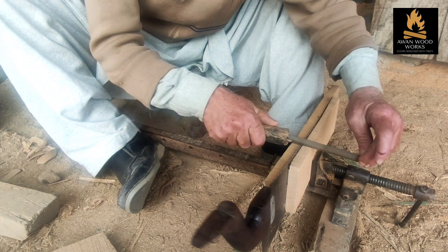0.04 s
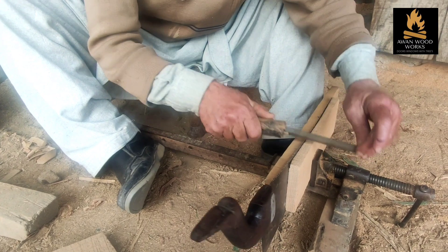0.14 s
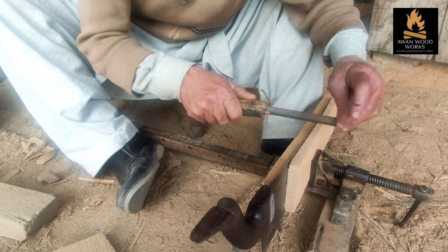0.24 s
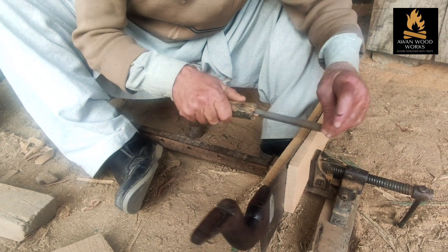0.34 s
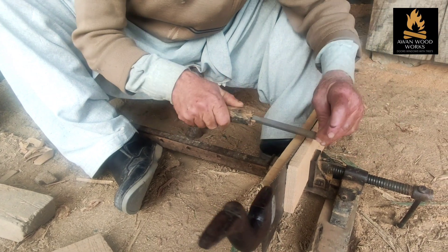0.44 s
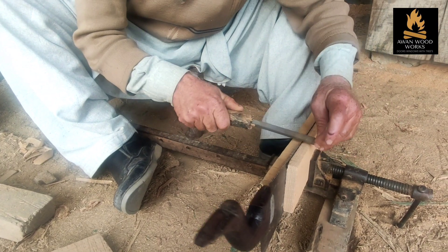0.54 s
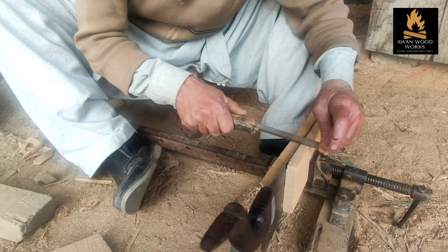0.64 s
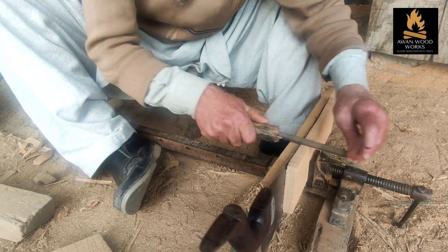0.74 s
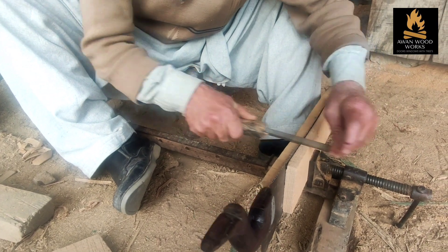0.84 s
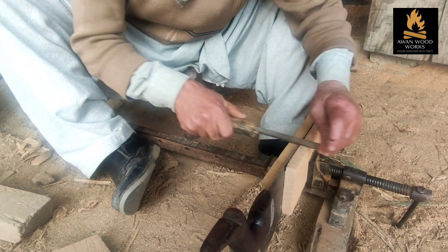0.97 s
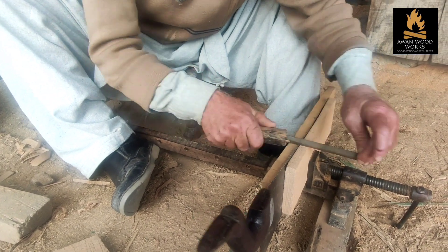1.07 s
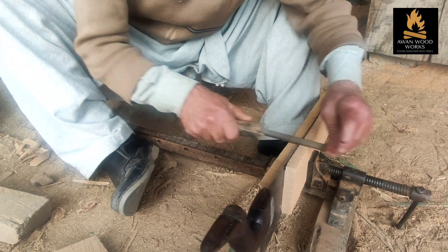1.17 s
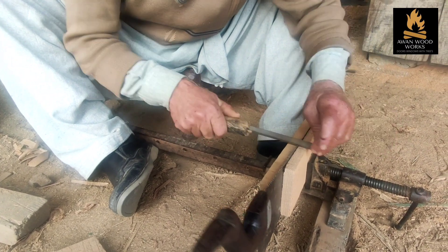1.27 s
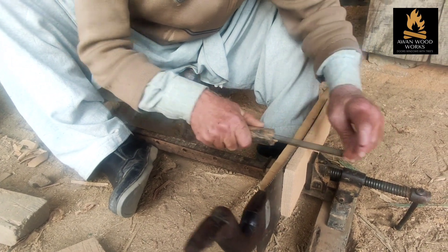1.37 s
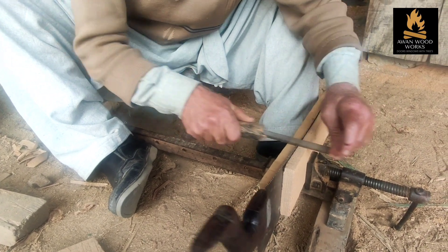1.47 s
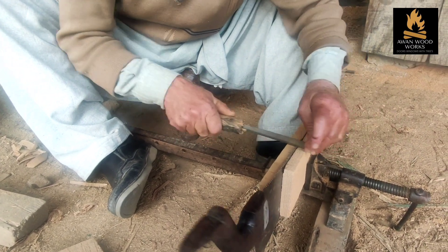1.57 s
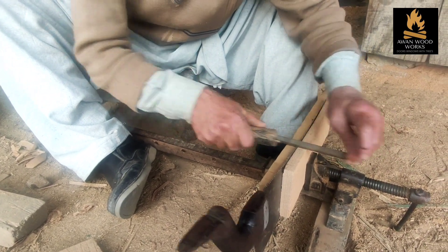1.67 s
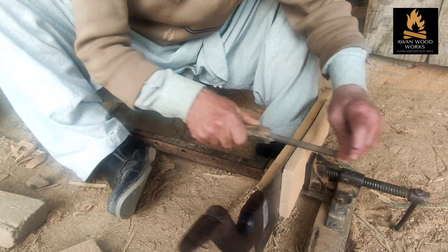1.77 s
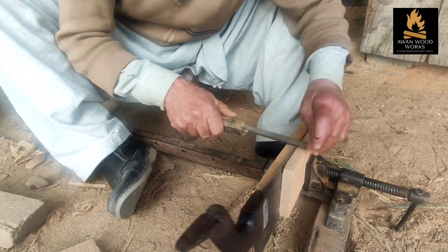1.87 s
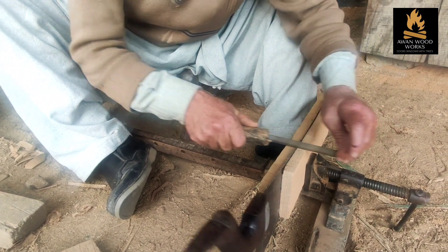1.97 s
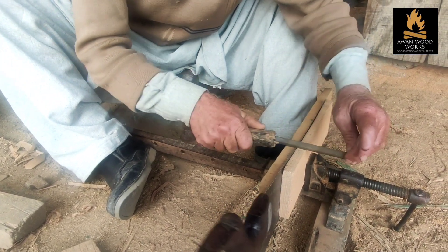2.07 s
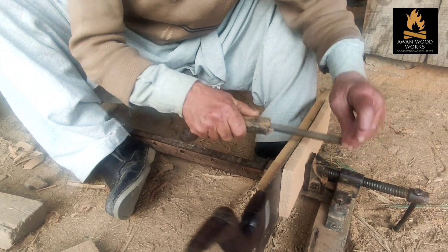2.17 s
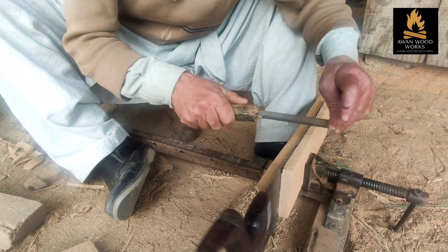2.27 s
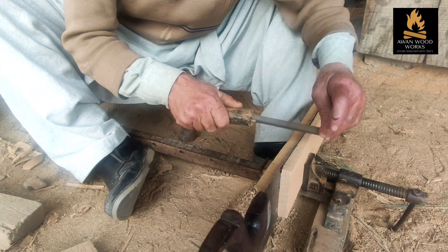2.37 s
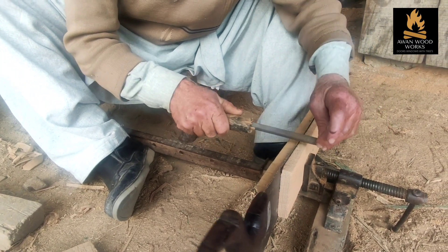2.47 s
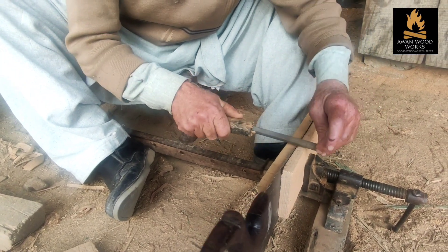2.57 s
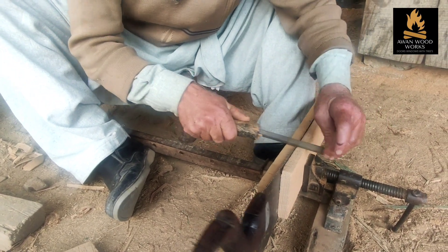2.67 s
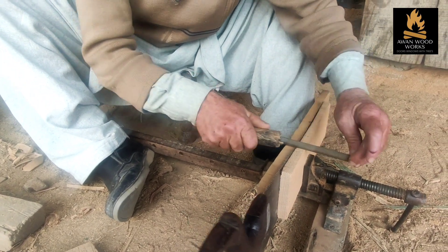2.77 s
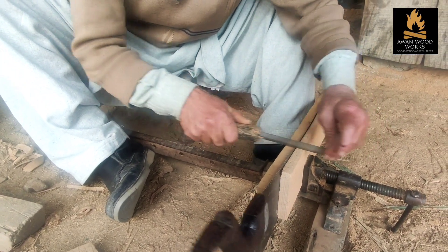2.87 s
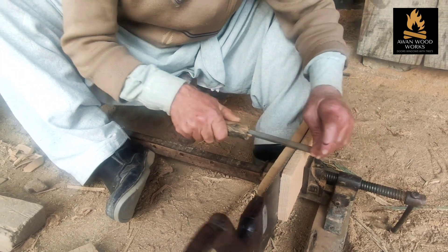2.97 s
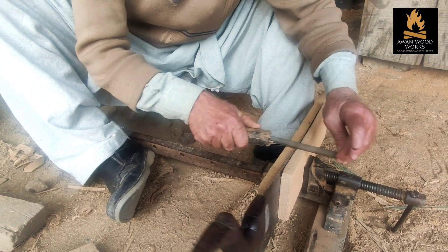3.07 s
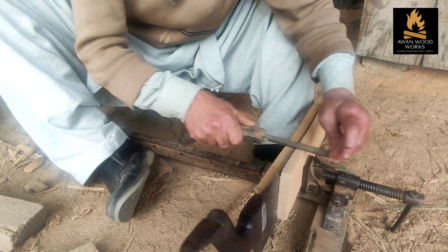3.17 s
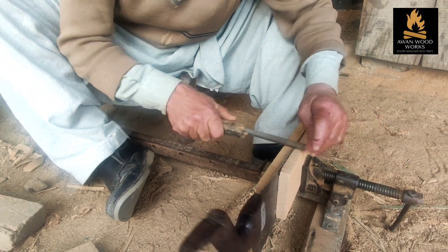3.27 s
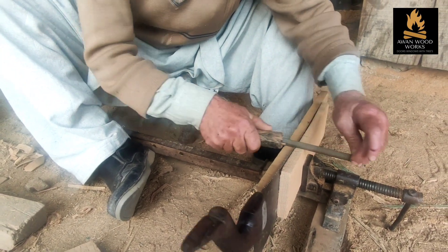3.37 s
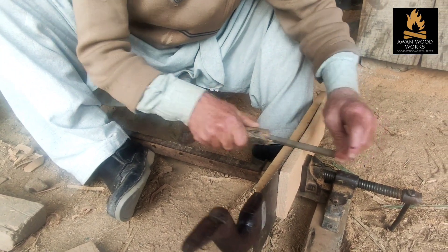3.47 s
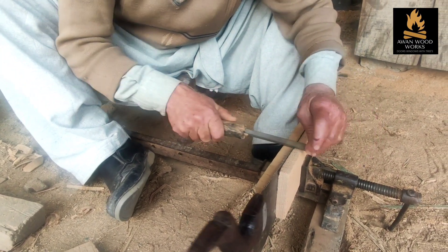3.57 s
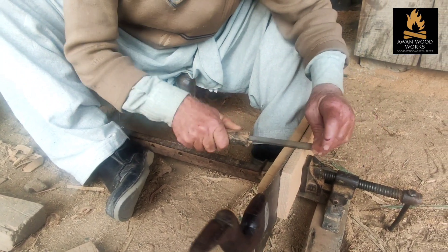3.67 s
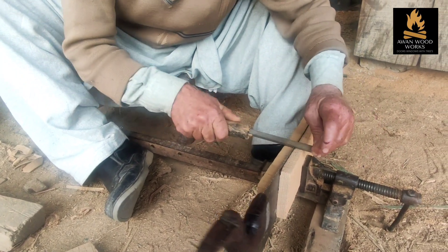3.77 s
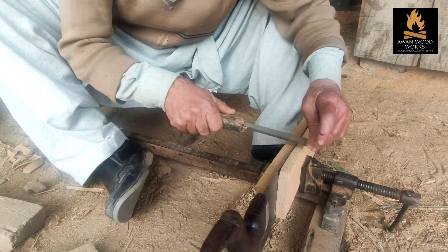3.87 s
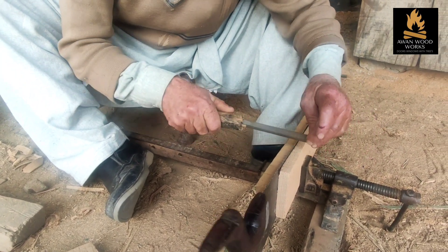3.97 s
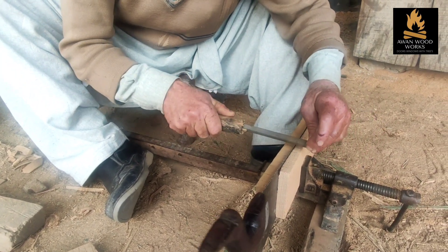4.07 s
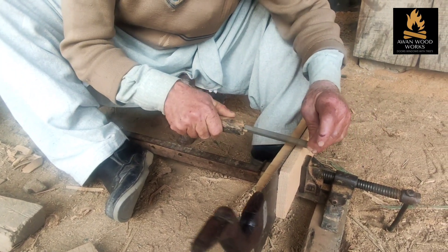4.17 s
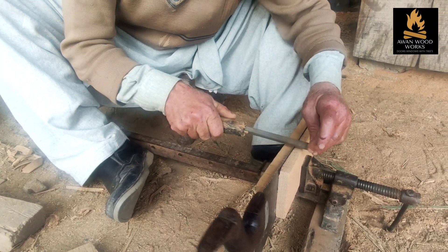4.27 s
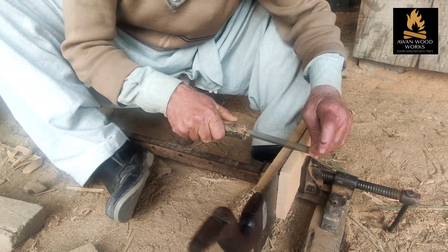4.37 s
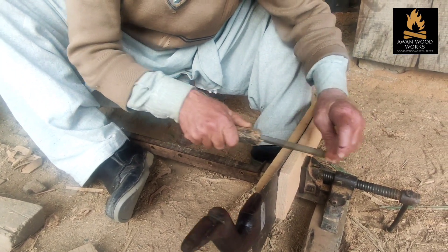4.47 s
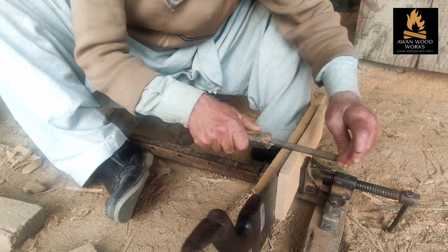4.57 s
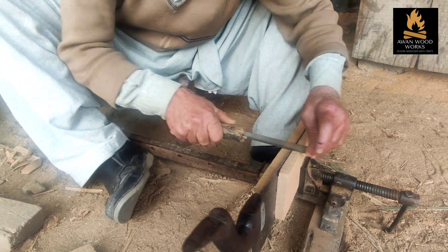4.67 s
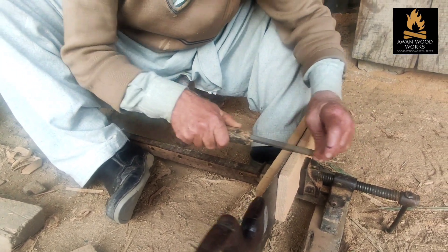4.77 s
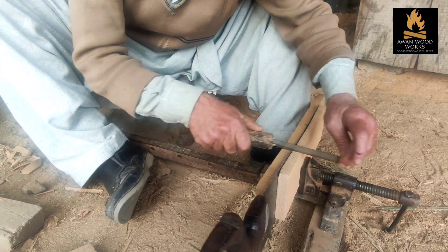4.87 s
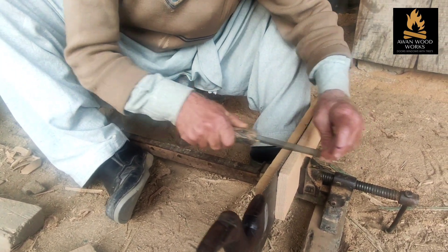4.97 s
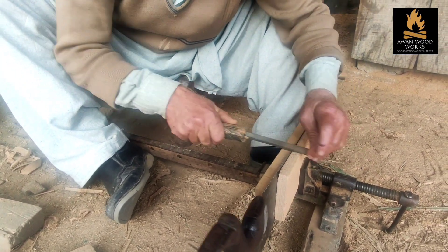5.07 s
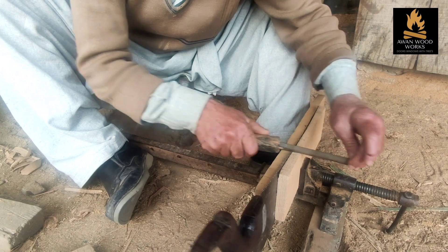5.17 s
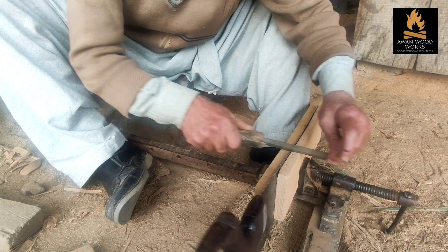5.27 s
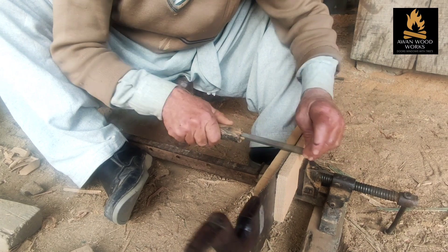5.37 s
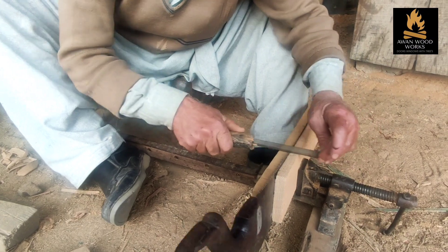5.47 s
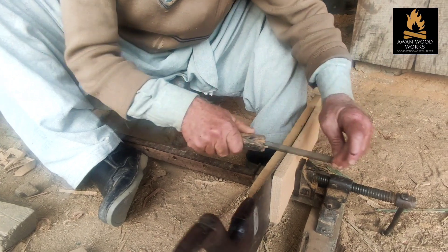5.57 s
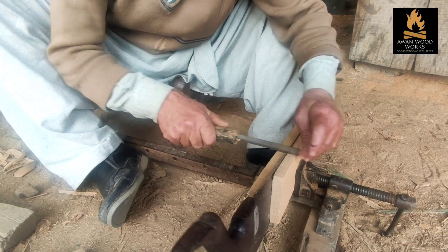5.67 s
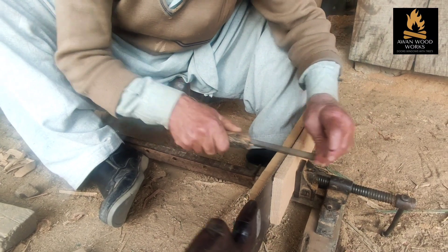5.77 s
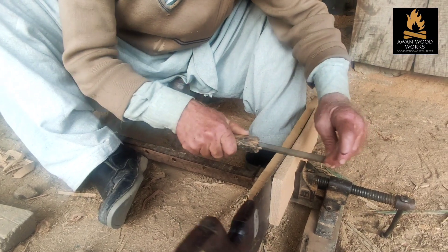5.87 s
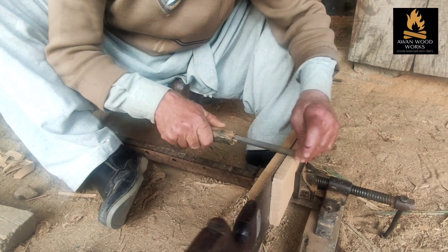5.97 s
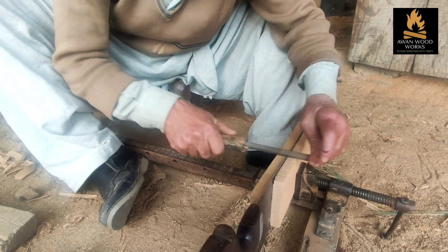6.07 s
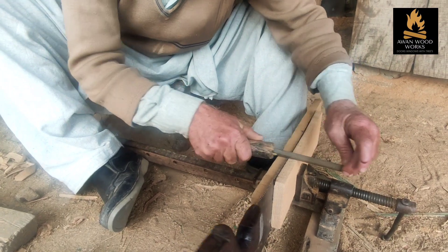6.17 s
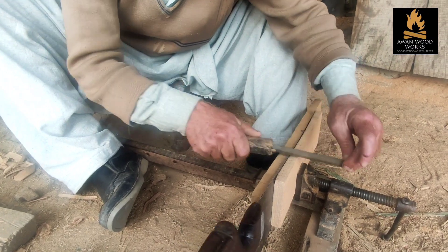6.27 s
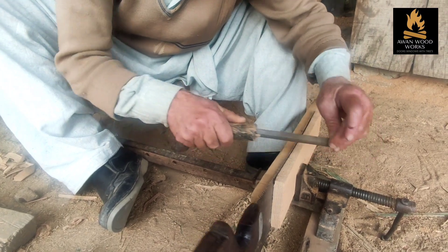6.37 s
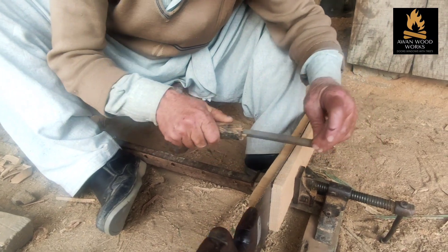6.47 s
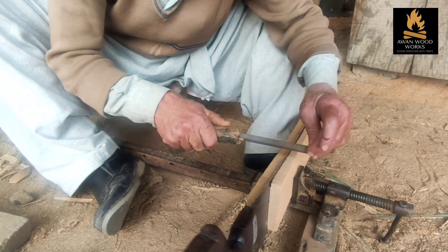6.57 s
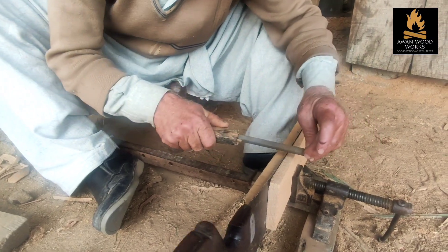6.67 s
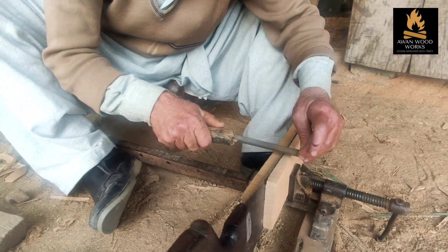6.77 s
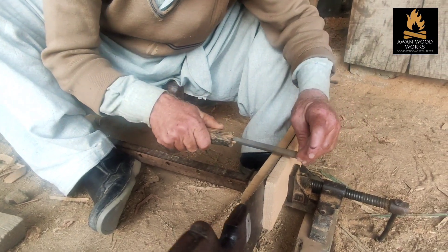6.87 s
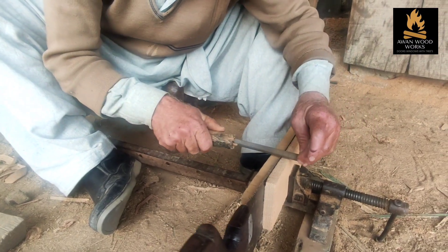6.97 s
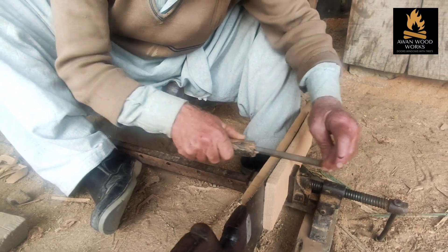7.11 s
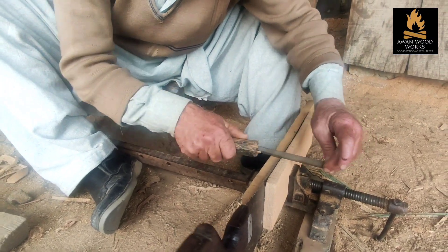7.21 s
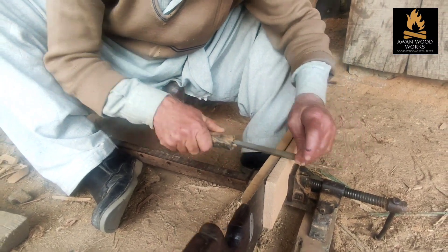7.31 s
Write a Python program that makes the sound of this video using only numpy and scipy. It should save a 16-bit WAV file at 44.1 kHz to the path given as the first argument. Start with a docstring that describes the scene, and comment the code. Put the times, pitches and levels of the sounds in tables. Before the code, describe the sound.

A steel file sharpens a hand saw held in a wooden vice, close by in a quiet workshop. One bright scrape opens the sound. From 0.7 to 2.2 seconds comes a run of quick back-and-forth strokes, five or six a second. Pushes swell into a broad rasp; pulls bite immediately and are brighter, some with a very brief, high metallic squeal. The file ticks lightly as it lands, and blade and vice resonate slightly.

After very faint bumps, a second spell runs from 2.7 to 3.8 seconds, catching and squeaking near 3.1, 3.4 and 3.7. A soft knock follows at 3.9. The longest spell lasts from 4.5 to 6.4 seconds, with sharp squeaky catches around 5.5 and 6.1. After a pause, a couple of last strokes start at about 7.1 seconds. Only a low, faint room hush fills the gaps, with little echo.

```python
"""Filing a hand saw

A steel file sharpens a saw clamped in a wooden vice, close by, in short spells of quick strokes.
Its ridges snap over a tooth, and this train of impulses drives the resonances of blade and vice.
A push swells and rasps broadly; a pull bites at once, is brighter, and now and then squeals as the
tooth locks into its modes. The file ticks as it lands and bumps between spells; the workshop is quiet."""
import sys
import numpy as np
from scipy import signal
from scipy.fft import rfft, irfft
from scipy.io import wavfile
from scipy.ndimage import uniform_filter1d

SR = 44100
rng = np.random.default_rng(int(sys.argv[2]) if len(sys.argv) > 2 else 0)


def dump(signal):
    """Clip the signal to [-1, 1] and save it as 16-bit WAV at the path in sys.argv[1]."""
    limited = np.clip(np.atleast_2d(signal).T, -1, 1)
    pcm = np.round(limited * 32767).astype(np.int16)
    wavfile.write(sys.argv[1], SR, pcm)


N = 323694
TIME, FREQ_HZ = np.arange(N) / SR, np.fft.rfftfreq(N, 1 / SR)

# spectrum of the pulls and the landing ticks: (frequency [Hz], relative spectral level [dB])
BRIGHT_SPECTRUM = [(50, -42), (120, -39), (280, -26), (550, -22), (800, -13), (1200, -2.5), (2100, -4.5),
                   (3600, 1.5), (5900, -9), (8200, -4), (11300, -25.5), (12300, -15), (15000, -20.5)]


def gain_of(db):
    """Amplitude ratio: a factor of ten for every 20 dB."""
    return 10 ** (np.asarray(db) / 20)


def unit_rms(x):
    """Normalisation to a mean power of 1."""
    return x / np.sqrt(np.mean(x ** 2) + 1e-20)


def curve_at(points, hz):
    """Interpolation of (frequency [Hz], value) points on a logarithmic frequency axis."""
    f, value = np.transpose(points)
    return np.interp(np.log(hz + 1), np.log(f + 1), value)


def add(mix, start_s, sound):
    """Superposition: a sound of several channels sums into the mix from its start time."""
    part = mix[:, max(round(start_s * SR), 0):][:, :sound.shape[1]]
    part += sound[:, :part.shape[1]]


def wander(rate_hz):
    """Random modulation: low-pass noise of rms 1."""
    return unit_rms(irfft(rfft(rng.standard_normal(N)) / (1 + (FREQ_HZ / rate_hz) ** 4), N))


def steady_band(x, low_hz, high_hz):
    """Band-pass filtering, with the level held steady by dividing by the running rms."""
    hz = FREQ_HZ + 1
    part = irfft(rfft(x) / (1 + (low_hz / hz) ** 12) / (1 + (hz / high_hz) ** 12), N)
    return part / np.sqrt(uniform_filter1d(part.mean(0) ** 2, size=1500) + 1e-12)


def radiate(pair, spectrum, lift_db=0):
    """Interaural coherence: two independent signals are coloured and blended, bass more than treble."""
    # likeness of left and right: (frequency [Hz], correlation [0-1])
    coherence = [(60, 0.47), (150, 0.98), (300, 0.75), (640, 0.8), (1400, 0.42), (3100, 0.12),
                 (7000, 0.0035)]
    alike = np.clip(curve_at(coherence, FREQ_HZ), -1, 1)
    left, independent = rfft(pair)
    right = alike * left + np.sqrt(1 - alike ** 2) * independent
    return irfft(np.array([left, right]) * gain_of(curve_at(spectrum, FREQ_HZ) + lift_db), N)


def workshop_air(level_db=-64, swell_db=-1.2, swell_hz=6):
    """Ambient noise: a low hush under slight amplitude modulation."""
    # noise floor: (frequency [Hz], relative spectral level [dB])
    spectrum = [(25, -27), (60, -7), (100, -4), (128, -4), (155, -1), (210, -11.5), (320, -7), (520, -18.5),
                (850, -16), (1500, -18), (3200, -24), (5000, -28), (8000, -35.5), (15000, -28.5)]
    hush = radiate(rng.standard_normal((2, N)), spectrum)
    return gain_of(level_db + swell_db * wander(swell_hz)) * hush / np.std(hush.mean(0))


def ring(x, decays):
    """Reverberation: dense modes act as a noise tail in which each band decays at its own rate."""
    hz, t, noise = signal.stft(rng.standard_normal((2, SR)), SR, nperseg=256)
    decay = gain_of(-60 * t / curve_at(decays, hz)[:, None])
    tail = signal.istft(noise * decay, SR, nperseg=256)[1]
    return signal.fftconvolve(x, tail / np.linalg.norm(tail[0]), axes=1)[:, :N]


def vice_boom(x):
    """Damped resonance: the low modes of the clamped wood ring on, alike at both ears."""
    # modes of the vice: (frequency [Hz], T60 [s], gain [dB])
    modes = [(178, .17, 1), (316, .3, -12), (416, .12, -8), (506, .12, -13)]
    drive, boom = x.mean(0), np.zeros(N)
    for hz, t60, db in modes:
        quality = hz * t60 * np.pi / np.log(1000)
        boom += gain_of(db) * signal.lfilter(*signal.iirpeak(hz, quality, fs=SR), drive)
    return boom


def body_response_db():
    """Frequency response of blade and vice: each resonance adds a Lorentzian peak or dip in dB."""
    # resonances: (frequency [Hz], bandwidth [Hz], left gain [dB], right gain [dB])
    resonances = [(181, 60, 10.5, 12.5), (316, 26, 9.5, 4), (415, 28, 14, 7), (503, 28, 10, 7.5),
                  (600, 140, 9, 8), (1025, 42, 8.5, 3), (1250, 230, 5, 1), (1535, 55, 13, 2),
                  (1640, 190, 4.5, 7.5), (2560, 60, 5, -1), (3295, 55, 3.5, 1), (4670, 150, 6.5, 6),
                  (5020, 61, 10, 4), (5306, 270, 8, 7), (6070, 110, 5, 8), (6650, 190, 2, 8),
                  (6970, 160, -7, -5), (7830, 92, 1, 6), (8460, 100, -0.5, 3), (9260, 450, 5.5, 4.5),
                  (10070, 160, 15, 4), (10780, 480, 10, 11), (11750, 260, 11, 7)]
    return sum(np.array([[left], [right]]) / (1 + (2 * (FREQ_HZ - hz) / width) ** 2)
               for hz, width, left, right in resonances)


def knocks(body_db, tick_db=-10, tick_t60_s=0.035, rise_s=0.0016):
    """Impact transients: sharp ticks of steel on steel and duller bumps decay exponentially."""
    # the file lands on a tooth: (time [s], relative level [dB])
    landings = [(0.742, -11), (1.068, -6), (1.561, -10), (2.022, -3), (2.699, -32), (2.723, -25),
                (3.399, -3), (3.554, -11), (3.717, -2),  (4.537, -15), (4.696, -22), (4.709, -13),
                (4.84, -9), (5.35, -10), (5.7, -12), (6.0, -15), (7.122, -16)]
    # moved along between spells, it nudges saw and vice: (time [s], level [dB], T60 [s])
    bumps = [(2.43, -60, 0.11), (2.535, -61.5, 0.098), (2.645, -58, 0.081), (3.922, -33, .1),
             (3.934, -36.5, 0.12), (3.949, -31.5, 0.078), (4.157, -68, 0.074)]
    # a bump through the vice: (frequency [Hz], relative spectral level [dB])
    bump_spectrum = [(50, -17), (160, -1.5), (300, -15.5), (700, -3.5), (1100, 6), (1600, -4), (2500, -1),
                     (3700, -1.5), (5000, -23), (8700, -18), (15000, -64)]
    out, t = np.zeros((2, N)), TIME[:SR // 4]
    attack = 1 - np.exp(-t / rise_s)
    steel = unit_rms(radiate(rng.standard_normal((2, N)), BRIGHT_SPECTRUM, body_db))
    wood = unit_rms(radiate(rng.standard_normal((2, N)), bump_spectrum, body_db))
    for k, (start, db) in enumerate(landings):
        burst = steel[:, k * len(t):(k + 1) * len(t)]
        add(out, start, burst * attack * gain_of(db + tick_db - 60 * t / tick_t60_s))
    for k, (start, db, t60) in enumerate(bumps):
        burst = wood[:, k * len(t):(k + 1) * len(t)]
        add(out, start, burst * attack * gain_of(db - 60 * t / t60))
    return out


def ridge_snaps(cuts_per_s, hiss, unevenness, patch_hz, patch_s, delay_at_1khz_s=0.012):
    """Impulse excitation: file ridges snap over the tooth and launch dispersive bending waves."""
    # uneven response of the blade's fine modes: (frequency [Hz], relative level spread [dB])
    spread = [(200, 3), (1500, 3.5), (4000, 4.5), (8000, 3.5), (13000, 6.5)]
    snaps = rng.choice([-1., 1.], (2, N)) * (rng.random(N) < cuts_per_s / SR)
    # dispersion: the treble outruns the bass, so each snap is drawn out
    wavenumber = np.sqrt(FREQ_HZ * 1000)
    snaps = irfft(rfft(snaps) * np.exp(-4j * np.pi * delay_at_1khz_s * wavenumber), N)
    excitation = unit_rms(snaps) + hiss * rng.standard_normal((2, N))
    hz, t, spectra = signal.stft(excitation, SR, nperseg=1024)
    # the fine modes shift as the contact moves: random patches of gain in frequency and time
    patches = rng.standard_normal(spectra.shape[1:])
    for axis, step in enumerate([hz[1] / patch_hz, t[1] / patch_s]):
        bell = np.exp(-(np.arange(-30, 31) * step) ** 2)
        patches = signal.fftconvolve(patches, np.expand_dims(bell, 1 - axis), "same")
    patches = np.minimum(unit_rms(patches), 1.7)
    colour = gain_of(unevenness * curve_at(spread, hz)[:, None] * patches)
    colour /= np.sqrt(np.mean(colour ** 2, 1, keepdims=True))
    return signal.istft(spectra * colour, SR, nperseg=1024)[1][:, :N]


def squeals(waver_hz=65, waver_rate_hz=240, throb_db=3, throb_rate_hz=170, edge_s=0.007):
    """Mode lock-in: the rough tones of a chattering tooth, and the power share they take from the rasp."""
    # a tooth locks in, mostly early in a pull: (time [s], duration [s], low mode [Hz],
    # high mode [Hz], power share [0-1] of the low, of the middle and of the high mode)
    lock_ins = [(0, 0.048, 3700, 8560, 0.1, 0.17, 0.27), (1.06, 0.1, 3310, 8500, 0.088, 0, 0.0093),
                (1.39, 0.047, 3534, 8300, 0.33, 0, 0.17), (1.71, 0.073, 3343, 8050, 0.28, 0.01, .03),
                (2.02, .06, 3450, 8330, 0.19, 0, 0.063), (3.086, 0.055, 3760, 8330, 0.29, 0.23, .33),
                (3.395, .06, 3520, 8500, 0.31, 0.037, 0.015), (3.713, .047, 3633, 8580, 0.25, 0.21, 0.39),
                (4.868, 0.041, 3500, 8580, 0.084, 0.019, .38), (5.506, 0.039, 3750, 8500, 0.46, 0, 0.097),
                (5.533, .042, 3750, 8600, 0.13, .45, 0.2), (5.84, 0.029, 3313, 8500, 0.17, 0.017, 0),
                (6.15, .042, 3540, 8440, 0.16, .04, .3)]
    # faint further modes: (frequency [Hz], glide [Hz/s], power relative to the high mode [0-1])
    overtones = [(9120, 1002.5, 0.14), (10650, 8001.5, 0.023), (12930, -2, 0.044)]
    middle_hz = 5400
    glides_hz_per_s = (5500, 4100, -1500)  # the three modes shift as the contact moves up the tooth
    tones, tonal_share = np.zeros((2, N)), np.zeros(N)
    drift, throb = wander(waver_rate_hz), np.array([wander(throb_rate_hz), wander(throb_rate_hz)])
    for start, length, low_hz, high_hz, low, middle, high in lock_ins:
        t = np.arange(0, length, 1 / SR)
        gate = np.clip(np.minimum(t, t[-1] - t) / edge_s, 0, 1)
        modes = list(zip((low_hz, middle_hz, high_hz), glides_hz_per_s, (low, middle, high)))
        modes += [(hz, glide, high * power) for hz, glide, power in overtones]
        for hz, glide, share in modes:
            offset, right_phase = rng.integers(N // 2), rng.uniform(-1, 1) * np.pi / 2
            span = slice(offset, offset + len(t))
            pitch_hz = hz + glide * (t - length / 2) + waver_hz * drift[span]
            phase = 2 * np.pi * np.cumsum(pitch_hz) / SR
            tone = np.sin([phase, phase + right_phase]) * gain_of(throb_db * throb[:, span])
            add(tones, start, np.sqrt(share * gate) * tone / np.std(tone.mean(0)))
            add(tonal_share[None], start, share * gate[None])
    return tones, np.minimum(tonal_share, 0.95)


def catch_lift_db(rise_ratio=0.27):
    """Stick and slip: the level rises quickly as the file catches and falls slowly as it works free."""
    # catches: (time [s], release time [s], lift of the rasp [dB])
    catches = [(1.001, 0.029, 4.5), (2.838, 0.008, 6.5), (3.019, 0.035, 6.5), (3.096, 0.049, 11),
               (3.722, 0.034, 9.5), (4.878, 0.045, 5), (4.977, 0.03, 8.5), (5.513, 0.05, 15.5),
               (5.632, 0.023, 2.0), (6.138, 0.06, 12), (6.279, 0.055, 5.5), (7.198, 0.037, 12.5)]
    lift_db = np.zeros(N)
    for peak_s, release_s, db in catches:
        width_s = release_s * np.where(TIME < peak_s, rise_ratio, 1)
        lift_db += db * np.exp(-np.minimum(abs(TIME - peak_s) / width_s, 10) ** 2)
    return lift_db


def add_stroke(envelopes, start, attack_s, shape_db, levels_db):
    """Inertia: of rasp, blade and vice, the heavier the part, the less it follows a stroke's shape."""
    follows = np.array([[1], [0.85], [0.6]])
    attack = np.minimum(TIME[:len(shape_db)] / attack_s, 1)
    stroke = attack * gain_of(levels_db + follows * shape_db)
    add(envelopes, start, stroke[:, max(-round(start * SR), 0):])


def filing(envelopes, scrape, rasp_db, blade_db, vice_db, bite, judder_depth_db, tones=0, tonal_share=0):
    """Amplitude modulation: strokes and judder shape the scrape in three bands: rasp, blade and vice."""
    vice_top_hz, blade_top_hz, fizz_hz = 850, 2200, 6500
    rasp, blade, vice = envelopes
    catch_db = catch_lift_db()
    rasp, blade = rasp * gain_of(catch_db), blade * gain_of(0.22 * catch_db)
    fizz = signal.sosfiltfilt(signal.butter(2, fizz_hz, "high", fs=SR, output="sos"), scrape)
    brightness = np.clip(rasp / gain_of(-18), 0.3, 2) ** bite  # a harder bite is brighter
    cutting = steady_band(scrape + (brightness - 1) * fizz, blade_top_hz, SR)
    treble = gain_of(rasp_db) * rasp * (np.sqrt(1 - tonal_share) * cutting + tones)
    middle = gain_of(blade_db) * blade * steady_band(scrape, vice_top_hz, blade_top_hz)
    bass = gain_of(vice_db) * vice * steady_band(scrape, 0, vice_top_hz)
    judder_db = judder_depth_db * wander(rate_hz=60)
    sway_db = wander(rate_hz=35)  # the hand presses unevenly
    return treble * gain_of(0.52 * judder_db) + (middle + bass) * gain_of(judder_db + sway_db)


def pushes(body_db, attack_s=0.0093, graze_attack_s=0.02, brake_s=0.047, fade_db_per_s=1101.5):
    """Friction noise grows with sliding speed: each push swells, holds and brakes ever faster."""
    # pushes: (time [s], time to braking [s], relative level [dB] of rasp, of blade and of vice,
    # swell depth [dB], swell time [s])
    strokes = [(0.727, 0.14, -18.5, -22, -37.5, 30.5, 0.081), (0.92, 0.1, -21, -22, -33.5, 20, 0.044),
               (1.219, 0.12, -18.5, -21.5, -32, 26.5, 0.089), (1.557, 0.1, -19.5, -23.5, -32.5, 10, 0.075),
               (1.856, 0.11, -19.5, -21, -31, 11.5, 0.091), (2.697, 0.17, -21, -23, -38.5, 33.5, 0.18),
               (2.925, 0.099, -22, -24.5, -33.6, 17.5, 0.049), (3.268, 0.078, -19.5, -24, -33, 8.5, 0.057),
               (3.549, 0.099, -18.5, -22, -31.0, 12.5, 0.08), (4.511, 0.12, -20.0, -21.6, -38, 41, 0.059),
               (4.69, 0.11, -20.0, -23.5, -33.5, 17.5, 0.099), (5.05, 0.084, -18.5, -23, -31, 8.5, 0.1),
               (5.342, 0.11, -19, -24, -31, 14.5, 0.065), (5.694, 0.092, -20.5, -24, -32.5, 13, 0.057),
               (5.995, 0.077, -15.5, -19, -28, 19.5, 0.15), (7.091, 0.17, -27, -24.5, -39, 35.5, 0.15),
               (7.319, 0.08, -17, -20.5, -27.5, 17.5, 0.077)]
    # light touches ahead of some spells:
    # (time [s], time to fade [s], relative level [dB] of rasp, of blade and of vice)
    grazes = [(0.696, 0.028, -55, -53, -66), (4.487, 0.028, -51, -48.5, -65), (7.073, 0.048, -56, -49, -72)]
    # scrape of a push: (frequency [Hz], relative spectral level [dB])
    spectrum = [(50, -43), (120, -42), (280, -21), (550, -13.5), (800, -10), (1200, -4), (2100, -4),
                (3600, 1.5), (5900, -10), (8200, -8.5), (11300, -28), (12300, -20.5), (15000, -24)]
    envelopes, t = np.zeros((3, N)), TIME[:SR // 2]
    for start, length, *levels_db, depth_db, swell_s in strokes:
        swell_db = -depth_db * np.maximum(1 - t / swell_s, 0) ** 2
        brake_db = fade_db_per_s * (np.hypot(np.maximum(t - length, 0), brake_s) - brake_s)
        add_stroke(envelopes, start, attack_s, swell_db - brake_db, np.vstack(levels_db))
    for start, length, *levels_db in grazes:
        fade_db = fade_db_per_s * np.maximum(t - length, 0)
        add_stroke(envelopes, start, graze_attack_s, -fade_db, np.vstack(levels_db))
    snaps = ridge_snaps(cuts_per_s=5000, hiss=0.44, unevenness=1.04, patch_hz=81.5, patch_s=0.038)
    return filing(envelopes, radiate(snaps, spectrum, body_db),
                  rasp_db=-1, blade_db=0.8, vice_db=-1.73, bite=0.17, judder_depth_db=0.54)


def pulls(body_db, attack_s=0.022, fade_db_per_s=528):
    """Friction noise follows contact force: a pull bites at once and mostly sags as the hand eases."""
    # pulls: (time [s], time to fade [s], relative level [dB] of rasp, of blade and of vice, sag [dB])
    strokes = [(-0.019, 0.15, -15, -22.5, -37.1, 6.5), (1.062, 0.13, -13.5, -21.5, -37.0, 10),
               (1.385, 0.12, -11.5, -19.5, -34.5, 14.5), (1.701, 0.12, -12.5, -22, -38.5, 9),
               (2.012, 0.12, -11, -21.5, -38, 14.5), (3.08, 0.14, -25.5, -27, -35, -0.5),
               (3.388, 0.12, -12, -23.5, -38, 9), (3.695, 0.047, -20.6, -31.5, -41, 5),
               (4.835, 0.17, -23, -24.5, -36, 2.2), (5.181, 0.11, -12.5, -19.5, -36, 11),
               (5.501, 0.14, -30.5, -27.3, -32, -8), (5.831, 0.096, -13, -19, -33.5, 12.5),
               (6.12, 0.2, -28, -25, -34, 0.5)]
    sag_share = np.array([[1], [0.6], [0]])  # rasp, blade, vice
    envelopes, t = np.zeros((3, N)), TIME[:SR // 2]
    for start, length, *levels_db, full_sag_db in strokes:
        sag_db = sag_share * full_sag_db * np.minimum(t / length, 1)
        fade_db = fade_db_per_s * np.maximum(t - length, 0)
        add_stroke(envelopes, start, attack_s, -fade_db, np.vstack(levels_db) - sag_db)
    snaps = ridge_snaps(cuts_per_s=8000, hiss=0.4, unevenness=0.83, patch_hz=125, patch_s=0.03)
    tones, tonal_share = squeals()
    return filing(envelopes, radiate(snaps, BRIGHT_SPECTRUM, body_db),
                  rasp_db=-1.24, blade_db=0, vice_db=-2.85, bite=0.095, judder_depth_db=0.87,
                  tones=tones, tonal_share=tonal_share)


def scene():
    """Source and filter: pushes, pulls and knocks ring in the blade and the vice, then in the room."""
    # decay of the blade's vibration: (frequency [Hz], T60 [s])
    blade_decay = [(200, 0.29), (1500, 0.11), (4000, 0.047), (14000, 0.064)]
    # reverberation of the workshop: (frequency [Hz], T60 [s])
    room_decay = [(150, 0.95), (1000, 0.31), (4000, 0.5), (14000, 0.12)]
    body_db = body_response_db()
    contact = pushes(body_db) + pulls(body_db) + knocks(body_db)
    saw = contact + gain_of(-6.5) * ring(contact, blade_decay) + vice_boom(contact)
    return saw + gain_of(-26.5) * ring(saw, room_decay) + workshop_air()


def record(dry):
    """Band limiting: a linear-phase low-pass filter removes the highest treble."""
    cutoff_hz = 15200
    low_pass = signal.firwin(301, cutoff_hz, window=("kaiser", 9), fs=SR)
    return signal.oaconvolve(dry, low_pass[None], "same")


dry = scene()
out = record(dry)
dump(out)
```